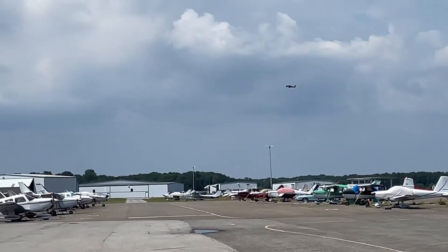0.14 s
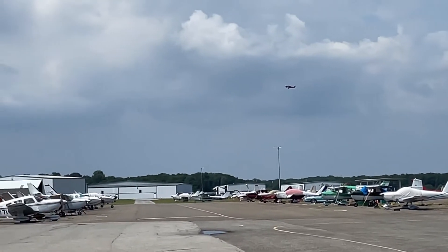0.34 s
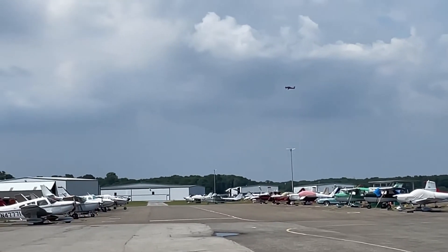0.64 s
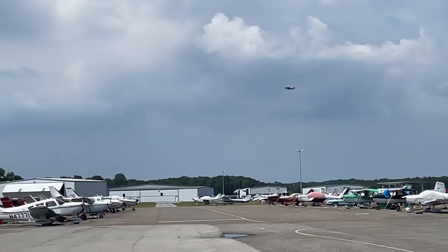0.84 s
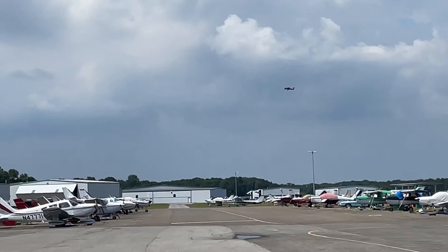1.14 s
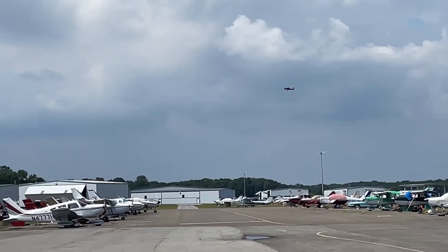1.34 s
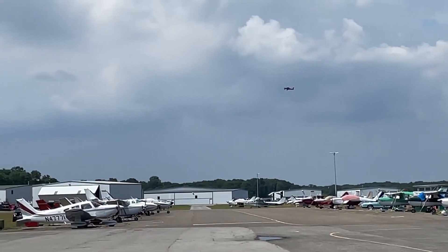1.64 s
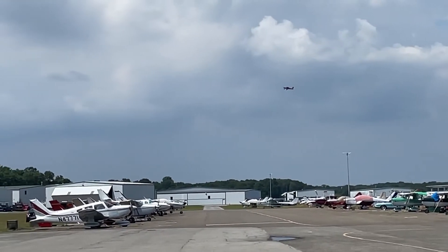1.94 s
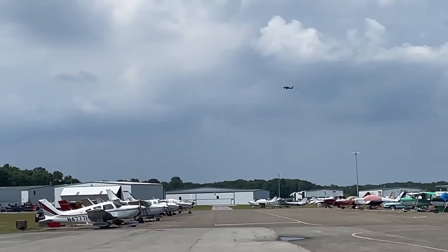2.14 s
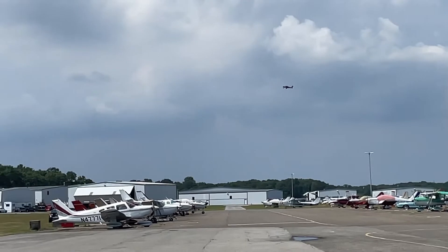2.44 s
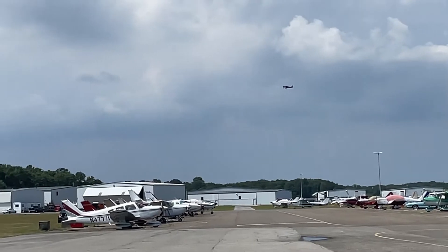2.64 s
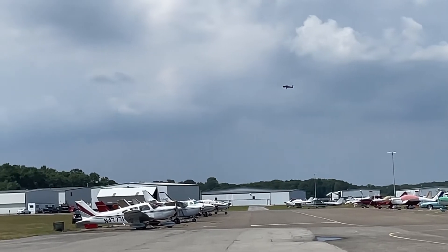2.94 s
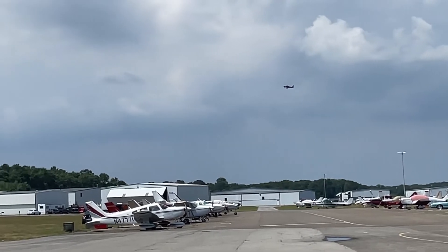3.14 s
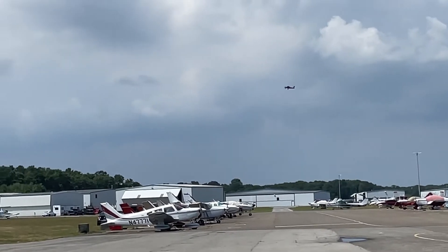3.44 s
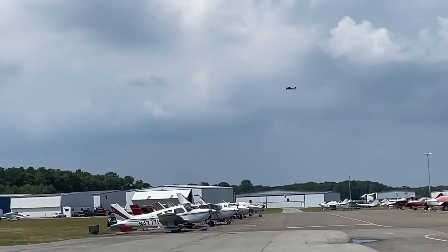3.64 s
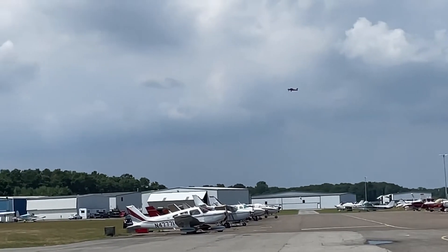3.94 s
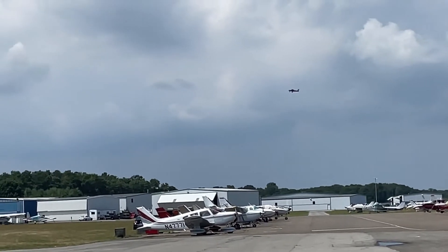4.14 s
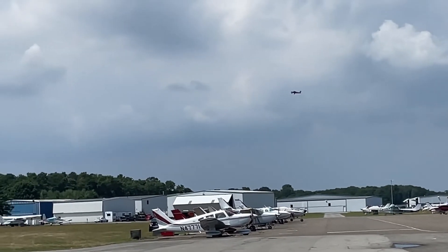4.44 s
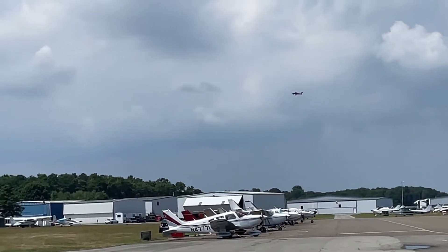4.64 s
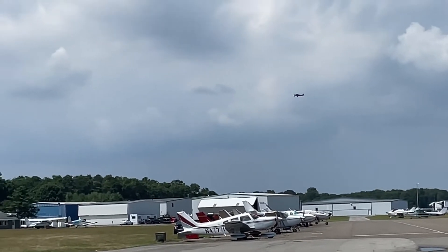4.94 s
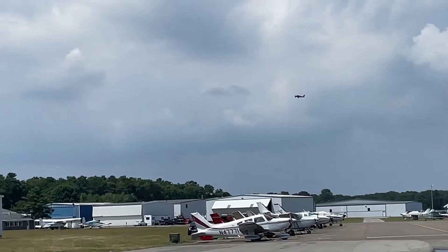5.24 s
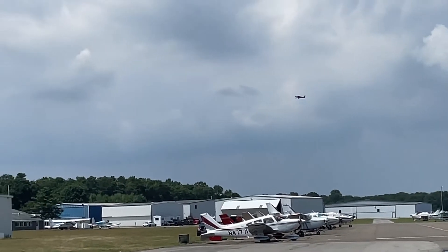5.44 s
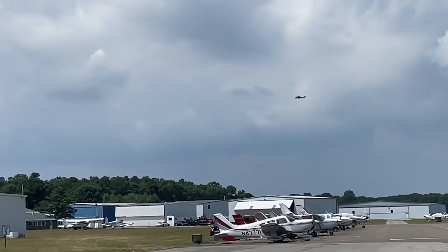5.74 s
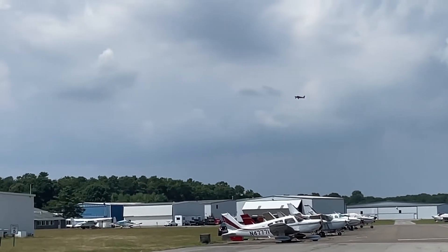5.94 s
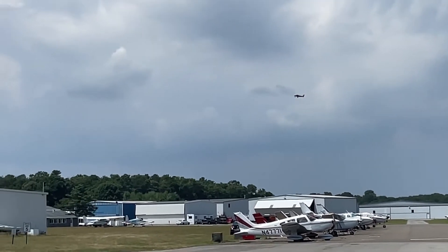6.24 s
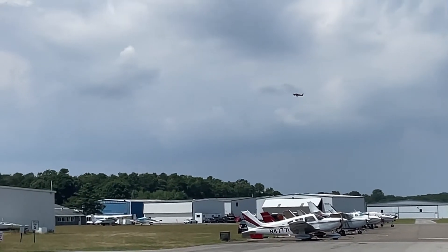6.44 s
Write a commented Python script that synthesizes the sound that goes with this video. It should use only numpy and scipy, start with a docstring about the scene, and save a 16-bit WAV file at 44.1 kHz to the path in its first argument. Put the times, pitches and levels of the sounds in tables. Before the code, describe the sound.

A windy outdoor airfield captured on a handheld phone, in wide, slightly phasey stereo. From 0 to 1.5 seconds, deep wind rumble and dull membrane thumps dominate, strongest around 0.4, 0.95 and 1.4, over a continuous airy hiss chopped quickly by two idling piston engines. The rumble drops away at about 1.5 to 1.8; a slower engine gives a short, narrow, chattering bark around 1.7 to 2.2, and the nearer engine's buzzy hum and rasp surge at 1.85. A distant propeller plane's low, wavering drone rises around 2, peaks near 3.5, almost vanishes at 4.1, then returns softly, its pitch sinking very slightly. Sharper, brighter wind slaps cluster around 3.4 to 3.9, 4.3, 5.6 and 6.3. From about 4.6 the nearby engine's rasp is stronger, continuing with hiss and fluttering gusts to the end at 6.6.

```python
"""Propeller plane over a windy apron

A small propeller plane, a stack of blade-rate partials, drones far off while gusts buffet a hand-held phone.
The wind is bands of fluttering noise; slaps of air are short swings of the microphone membrane.
Two engines run on the ground nearby: one hums in harmonics and rasps in pulsed noise, and with a slower one
it chops a higher hiss; the slower one barks briefly in one narrow band.
The phone's stereo processing turns the phase between left and right band by band."""
import sys
import numpy as np
from scipy import signal
from scipy.fft import rfft, irfft, next_fast_len
from scipy.io import wavfile
from scipy.ndimage import uniform_filter1d, map_coordinates

SR = 44100
rng = np.random.default_rng(int(sys.argv[2]) if len(sys.argv) > 2 else 0)


def wrap_up_sound(samples):
    """Save the sound to the file named by the first command line argument, as 16-bit audio."""
    columns = np.atleast_2d(samples).T
    # keep every value between -1 and 1, then stretch to whole-number steps
    tamed = np.clip(columns, -1, 1)
    steps = np.round(tamed * 32767).astype(np.int16)
    wavfile.write(sys.argv[1], SR, steps)


N = 290178
SIZE = next_fast_len(N)  # FFT length
T = np.arange(N) / SR  # s
F = np.maximum(np.fft.rfftfreq(SIZE, 1 / SR), 1)  # Hz
NEAR_HZ, SLOW_HZ = 59.27, 44.7  # mean firing rates of the ground engines


def undb(db):
    """Decibels to amplitude gain."""
    return np.exp(np.asarray(db) * (np.log(10) / 20))


def unit(x):
    """Scale to rms 1."""
    return x / np.sqrt(np.mean(x ** 2))


def curves(table):
    """Interpolate each column of a time table to every sample."""
    s, *columns = np.transpose(table)
    return [np.interp(T, s, c) for c in columns]


def on_log(table, hz):
    """Read (Hz, value) points on a log-frequency axis."""
    f, value = np.transpose(table)
    return np.interp(np.log(hz), np.log(f), value)


def noise(gain):
    """Gaussian noise of rms 1 with a gain for each frequency."""
    spectrum = rng.standard_normal(len(F)) + 1j * rng.standard_normal(len(F))
    return unit(irfft(gain * spectrum, SIZE)[:N])


def coloured(table):
    """Noise of rms 1 with the tabled spectrum, falling 24 dB per octave below its first point."""
    low_cut = np.minimum(F / table[0][0], 1) ** 4
    return noise(undb(on_log(table, F)) * low_cut)


def shaped(x, gain):
    """Filter by a gain for each frequency."""
    return irfft(rfft(x, SIZE) * gain, SIZE)[:N]


def walk(rate_hz):
    """Random levels of rms 1, rate_hz a second, joined by smooth slews."""
    k = 16  # steps per level
    held = np.repeat(rng.standard_normal(int(T[-1] * rate_hz) + 2), k)
    smooth = uniform_filter1d(uniform_filter1d(held, k), k)
    return np.interp(T * rate_hz * k, np.arange(len(smooth)), unit(smooth))


def spread(direct, scattered, table):
    """Give left and right opposite phase turns; part of the sound is unlike between them."""
    f, lead_rad, alike, pan_db = np.transpose(table)
    turn = np.exp(.5j * np.interp(F, f, lead_rad)) * undb(np.interp(F, f, pan_db) / 2)
    unlike = np.sqrt((1 - np.interp(F, f, alike)) / 2)
    common = rfft(direct, SIZE) * np.sqrt(1 - unlike ** 2)
    opposed = rfft(scattered, SIZE) * unlike
    return irfft(np.array([(common + opposed) * turn, (common - opposed) / turn]), SIZE)[:, :N]


def stack(phase, orders, shimmer_db, blur_rad):
    """Sum partials of one cycle; moving air wavers each in level and, the higher the more, in phase."""
    total = 0
    for k, db in orders:
        gain = undb(db + shimmer_db * walk(6.5)) * np.sqrt(2)
        total = total + gain * np.sin(k * (phase + blur_rad * walk(25)) + rng.uniform(0, 2 * np.pi))
    return total


def firing(hz, wander):
    """Phase in rad of an engine's firing cycle; its speed wanders by a small fraction."""
    return 2 * np.pi * np.cumsum(hz * (1 + wander * walk(3))) / SR


def puffs(phase, depth):
    """Gas escapes once a firing, swelling and dying away; every puff has its own size."""
    turns = phase / (2 * np.pi)
    size = undb(2.2 * rng.standard_normal(N // 100))[turns.astype(int)]  # 2.2 dB scatter
    pulse = np.sin(np.pi * (turns % 1) ** 0.75) ** 4
    return unit(1 + depth * size * pulse)


def gusting():
    """Rumble and brightness in dB: gusts add power to steady wind; the loudest air sets the brightness."""
    # steady wind on the microphone: time_s, rumble_db, brightness_db
    steady = [(0, -27, -2), (.5, -28.5, -11), (.64, -20, -22), (.87, -18, -20), (.93, -29.5, -15),
              (1.16, -24, -16), (1.21, -16, -12), (1.33, -17.5, -12), (1.46, -19.5, -13),
              (1.49, -29.5, -14), (1.75, -37, -32), (2.3, -29, -7.5), (2.95, -30, -9.5), (3.3, -31.5, -2),
              (3.9, -28.5, -9.5), (4.7, -32, -5), (5.4, -30.5, -4), (5.9, -35.5, -12.5), (6.2, -28, -3),
              (6.58, -32.5, -4.5)]
    # gusts on top of it: peak_s, rumble_db, length_s, brightness_db
    gusts = [(0.003, -19, 0.069, -49), (0.24, -17.5, 0.19, -44), (0.383, -12, 0.013, -25),
             (0.475, -17, 0.047, -29), (0.589, -18, 0.069, -13.5), (0.957, -13.5, 0.03, -9),
             (1.073, -20, 0.14, -17), (1.82, -24.5, .07, -26), (1.975, -30.5, 0.076, 1),
             (2.17, -26, 0.086, -11), (2.268, -23.5, 0.038, -10), (2.595, -27, 0.03, -2),
             (2.708, -29, 0.031, 1), (2.818, -26, 0.041, -5.5), (3.181, -22, 0.038, -21),
             (3.41, -27.5, 0.13, -10.5), (3.504, -25, .05, -5.5), (3.552, -22.5, 0.045, 3),
             (3.64, -25, 0.081, -2.5), (3.856, -20, 0.049, 0.5), (4.349, -22, 0.053, 5.5),
             (4.28, -21, 0.033, -3.5), (4.43, -21.5, 0.057, -5), (4.921, -26.5, 0.055, -1),
             (5.05, -25.5, 0.15, -8.5), (5.32, -27.5, 0.14, -4), (5.499, -24.5, 0.1, 0.5),
             (5.731, -27, 0.17, -1), (6.1, -27.5, 0.046, 0.5), (6.295, -23.5, 0.049, -3.5),
             (6.418, -30, 0.16, -7)]
    rumble_db, bright_db = curves(steady)
    power = undb(rumble_db) ** 2
    weighted = power * bright_db
    for s, db, length_s, gust_bright_db in gusts:
        i = slice(max(int((s - 2 * length_s) * SR), 0), int((s + 2 * length_s) * SR))
        gust = undb(db) ** 2 * np.exp(-(2 * (T[i] - s) / length_s) ** 2)
        power[i] += gust
        weighted[i] += gust * gust_bright_db
    return 10 * np.log10(power), weighted / power


def wind():
    """Bands of pressure noise; brightness lifts the upper bands, and a shared flutter shakes them most."""
    # half-octave eddies at brightness 0: centre_hz, level_db (against the rumble)
    eddies = [(26, -25.5), (40, -16), (60, -6), (90, -5.5), (130, -6), (190, -4.5), (270, -3.5), (380, -6),
              (540, -10.5), (760, -14.5), (1070, -38)]
    # part unlike between left and right: frequency_hz, side_db (against the common part)
    side_levels = [(50, -24), (120, -13), (300, -11), (1000, -14)]
    rumble_db, bright_db = gusting()
    flutter, mid, side = walk(45), 0, 0
    for hz, db in eddies:
        shape = np.exp(-.5 * (np.log2(F / hz) / 0.29) ** 2)
        common, opposed = (noise(shape) for _ in range(2))
        reach = np.clip(np.log2(hz / 120) / 1.134, 0, 1.8)  # share of the brightness this band takes
        flutter_db = (0.5 + 1.3 * reach) * flutter + 1.27 * walk(20)
        gain = undb(db + rumble_db + reach * bright_db + flutter_db)
        mid = mid + gain * common
        side = side + gain * opposed * undb(on_log(side_levels, hz))
    return np.array([mid + side, mid - side])


def plane():
    """Blade-rate partials, the pitch sinking slowly as it draws past."""
    # the plane as it arrives: time_s, level_db, tilt_db (per partial above the fourth)
    passing = [(0, -58.5, -2), (1, -55, -1), (1.6, -48, 1.5), (2, -41, 0), (2.5, -46.5, 2),
               (2.75, -42.5, -2.5), (3.1, -42.5, -1), (3.5, -37.5, -0.5), (4.1, -65, 4), (4.7, -47.5, -0.5),
               (5.3, -43.5, -1.5), (5.9, -45, 1), (6.58, -46, 0.5)]
    # partials of the blade rate: multiple, level_db (relative)
    blade_orders = [(2, -3), (3, -1), (4, 1.5), (5, -2), (6, -5), (7, -11), (8, -15.5), (9, -24), (10, -25)]
    level_db, tilt_db = curves(passing)
    hz = 82.8 - .28 * np.maximum(T - 3.2, 0)  # sinks .28 Hz per s from 3.2 s
    phase = 2 * np.pi * np.cumsum(hz * (1 + 0.0013 * walk(3.97))) / SR
    orders = [(k, order_db + tilt_db * max(k - 4, 0)) for k, order_db in blade_orders]
    return undb(level_db) * stack(phase, orders, shimmer_db=3, blur_rad=0.06)


def engines(near, slow):
    """Firing harmonics hum under a rasp pulsed by the firings; the slower engine barks in a narrow band."""
    # nearer engine: time_s, hum_db, rasp_db
    near_levels = [(0, -50, -60), (.7, -48, -57.5), (1.35, -50.5, -48.5), (1.58, -57.5, -60),
                   (1.85, -41.5, -42), (2.1, -48, -53), (2.3, -45.5, -49), (2.6, -48.5, -51.5),
                   (2.9, -50, -54), (3.4, -48, -48), (3.85, -45.5, -45), (4, -45.5, -48),
                   (4.62, -49.5, -39.5), (4.92, -47, -40), (5.39, -49.5, -43), (5.66, -49, -40.5),
                   (6.58, -52, -40.5)]
    # hum spectrum: frequency_hz, level_db (relative)
    hum_spectrum = [(100, 1), (300, -5), (350, -2), (480, -1), (540, -8), (600, -3), (720, -4), (780, -9),
                    (900, -7), (960, -15), (1100, -16), (1300, -15), (1500, -26)]
    # rasp spectrum: frequency_hz, density_db (per Hz, relative)
    rasp_spectrum = [(500, 6), (900, 2.5), (1450, 3.5), (1800, 3.5), (2000, 6), (2250, -0.5), (2450, -10.5),
                     (2650, -11.5), (3100, -12.5), (3700, -61.5)]
    # exhaust bark of the slower engine: time_s, level_db
    bark_levels = [(1.3, -69.5), (1.62, -57), (1.72, -47), (1.9, -51), (2.05, -55), (2.2, -52), (2.45, -67),
                   (3, -72)]
    # stereo image of the hum, nearly opposed in its middle range:
    # frequency_hz, left_lead_rad, alike (0-1), left_minus_right_db
    hum_image = [(100, .8, 1, 0), (300, 1, 1, 0), (350, 2.7, 1, 0), (600, 2.7, 1, 1), (950, 2.2, 1, 2),
                 (1300, .8, 1, 0)]
    # stereo image of the rasp, from another side: frequency_hz, left_lead_rad, alike (0-1), left_minus_right_db
    rasp_image = [(500, 1.5, .6, 0), (750, 2.2, .8, 0), (1000, 1.8, .8, 0), (1350, 0, .95, -2),
                  (1780, -.9, .95, -2), (1880, 1.9, .92, 5), (2300, 1.3, .9, 3), (2700, .6, .8, 0),
                  (3200, 0, 1, 0)]
    hum_db, rasp_db = curves(near_levels)
    orders = [(k, on_log(hum_spectrum, k * NEAR_HZ)) for k in range(3, 23)]
    hum = undb(hum_db) * stack(near, orders, shimmer_db=3.5, blur_rad=.065)
    gate = puffs(near, depth=0.53) * undb(rasp_db + 1.4 * walk(8.2))
    bark_noise = noise(np.exp(-.5 * ((F - 1990) / 150) ** 2))  # centre and spread, Hz
    bark = puffs(slow, depth=5) * undb(curves(bark_levels)[0]) * bark_noise
    direct = gate * coloured(rasp_spectrum) + bark
    scattered = gate * coloured(rasp_spectrum)
    return spread(hum, 0 * hum, hum_image) + spread(direct, scattered, rasp_image)


def hiss(near, slow):
    """Both engines chop a broad hiss; the top end follows the nearer one and flickers."""
    # hiss of both engines: time_s, hiss_db (below 7 kHz), top_db (above 7 kHz)
    hiss_levels = [(0, -42, -40.5), (.93, -44.5, -49), (1.33, -41.5, -42.5), (1.52, -39.5, -46),
                   (1.74, -39, -40.5), (1.85, -43, -44), (2.1, -41, -46), (2.6, -43.5, -44.5),
                   (2.95, -43, -50), (4.1, -45, -45), (4.86, -46.5, -43), (5.4, -45.5, -46.5),
                   (5.8, -47, -47.5), (6.16, -46.5, -40.5), (6.58, -46.5, -47.5)]
    # hiss spectrum: frequency_hz, density_db (per Hz, relative)
    hiss_spectrum = [(250, 18), (650, 11.5), (1000, 9.5), (1700, 3), (2500, 0.5), (4000, -2), (6000, -7),
                     (8000, -14), (9500, -14), (10500, -20.5), (12000, -28.5), (13000, -46), (15000, -49.5)]
    # stereo image of the hiss: frequency_hz, left_lead_rad, alike (0-1), left_minus_right_db
    hiss_image = [(50, 0, .9, 0), (450, -.2, .3, 0), (650, 2.4, .75, 2), (950, 2.1, .7, 2),
                  (1450, .5, .75, 0), (1750, -.1, .9, 0), (1900, .9, .55, 3), (2400, .8, .6, 2),
                  (2900, 0, 1, 0), (6200, 0, 1, 0), (6450, -.5, .9, 0), (7000, -1, .82, 0),
                  (7500, -2, .8, 0), (8150, -3.14, 1, 0), (8900, -3.9, .85, 0), (10200, -5.2, .72, 0),
                  (10800, -6.28, 1, 0), (12600, -6.28, 1, 0), (13300, -8, .3, 0), (14000, -9.42, 1, 0)]
    near_share = .45  # of the chopping power
    hiss_db, top_db = curves(hiss_levels)
    near_power = near_share * puffs(near, depth=.8) ** 2
    slow_power = (1 - near_share) * puffs(slow, depth=1.1) ** 2
    low = np.sqrt(near_power + slow_power) * undb(hiss_db + .3 * walk(9.6))
    top = puffs(near, depth=.22) * undb(top_db + 1.3 * walk(24))
    upper = 1 / (1 + (7000 / F) ** 6)
    sources = [coloured(hiss_spectrum) for _ in range(2)]
    direct, scattered = [low * shaped(h, 1 - upper) + top * shaped(h, upper) for h in sources]
    return spread(direct, scattered, hiss_image)


def through_air(x):
    """Uneven air: narrow bands swell and fade on their own, alike in left and right."""
    patch_hz, patch_s, patch_db = 180, .2, 1.4  # width, life and rms depth of a patch
    f, t, frames = signal.stft(x, SR, nperseg=512)
    grid = rng.standard_normal((int(f[-1] / patch_hz) + 2, int(t[-1] / patch_s) + 2))
    places = np.meshgrid(f / patch_hz, t / patch_s, indexing="ij")
    gain = undb(patch_db * unit(map_coordinates(grid, places, order=1)))
    gain = gain / np.sqrt(np.mean(gain ** 2))
    return signal.istft(frames * gain, SR, nperseg=512)[1][:, :N]


def slaps():
    """Each slap of air swings the membrane for a cycle or two; the quick swings are the shortest."""
    # single slaps: time_s, level_db, sharpness_db (lifts the quick swings)
    slap_list = [(0.236, -18.5, -23), (.304, -13.5, -31), (0.328, -13.5, -29), (0.447, -19, -48),
                 (0.569, -26, -35), (0.661, -31, -41), (.84, -17.5, -35), (0.95, -10, -14.5),
                 (.957, -4.5, -25), (.988, -22, -26), (1.212, -15, -28), (1.393, -7, -38), (1.446, -9, -25),
                 (2.582, -23, -38), (2.809, -8, -35), (2.877, -15.5, -35), (3.162, -11.5, -27),
                 (3.396, -12, -14), (3.456, -10, -24), (3.478, -15, -22), (3.531, -34, -12),
                 (3.553, -17, -11), (3.576, -16, -5.5), (3.622, -14, -11.5), (3.637, -17, -9.5),
                 (3.662, -14, -33), (3.821, -11, -27), (3.844, -15, -26), (3.853, -7, -14),
                 (3.872, -17.5, -21), (3.903, -13.5, -19), (4.286, -6.5, -11.5), (4.34, -19, -20),
                 (4.353, -15.5, -14), (4.366, -16.5, -21), (4.415, -25, -12), (4.432, -15.5, -30),
                 (4.74, -18, -20), (4.911, -13.5, -19), (5.298, -12, -19), (5.48, -10.5, -28),
                 (5.609, -10.5, -10), (5.632, -15, -13), (5.655, -20.5, -2.5), (5.698, -12.5, -33),
                 (5.75, -18.5, -10), (5.774, -17, -9.5), (6.08, -18, -26), (6.101, -13, -21),
                 (6.283, -18.5, 0), (6.3, -10.5, -17), (6.37, -14.5, -15), (6.466, -15.5, -9.5)]
    # what a slap sets swinging: mean_hz, level_db (against the slap), lift (share of sharpness, 0-1)
    swings = [(134, -4.5, 0.08), (247.6, -4.5, 0.11), (394, -1.5, 0.34), (597, 3, 1), (862, -3, 1)]
    out = np.zeros((2, N))
    chance = rng.standard_normal((len(slap_list), 1 + 2 * len(swings)))
    for (s, db, sharp_db), (pan_db, *draw) in zip(slap_list, chance):
        i = np.arange(int((s - .03) * SR), min(int((s + .06) * SR), N))
        side_db = pan_db * np.array([[1], [-1]])
        for k, (hz, swing_db, lift) in enumerate(swings):
            length_s = .00489 * (170 / hz) ** .68
            t = T[i] - s - .001 - .9 * length_s  # slower swings peak later
            pitch_hz = hz * (1 + .08 * draw[2 * k])
            swing = np.exp(-(t / length_s) ** 2) * np.cos(2 * np.pi * pitch_hz * t + draw[2 * k + 1])
            out[:, i] += undb(db + swing_db + lift * sharp_db + side_db) * swing
    return out


def scene():
    """Wind and slaps on the microphone, the plane, and the ground engines through uneven air."""
    near, slow = firing(NEAR_HZ, wander=.001), firing(SLOW_HZ, wander=.006)
    ground = through_air(engines(near, slow) + hiss(near, slow))
    return wind() + plane() + ground + slaps()


def record(dry):
    """The phone cuts the deepest bass, below 35 Hz, and the top, above 14 kHz."""
    high_pass = signal.butter(3, 35, "high", fs=SR, output="sos")
    low_pass = signal.ellip(8, .2, 70, 14000, fs=SR, output="sos")
    return signal.sosfilt(low_pass, signal.sosfilt(high_pass, dry))


dry = scene()
out = record(dry)
wrap_up_sound(out)
```